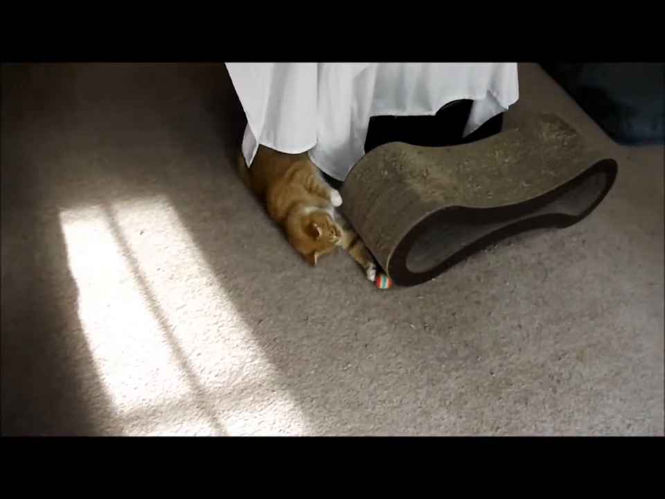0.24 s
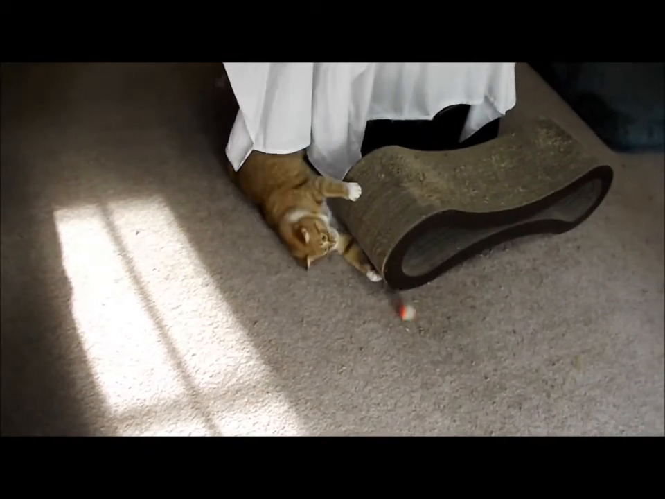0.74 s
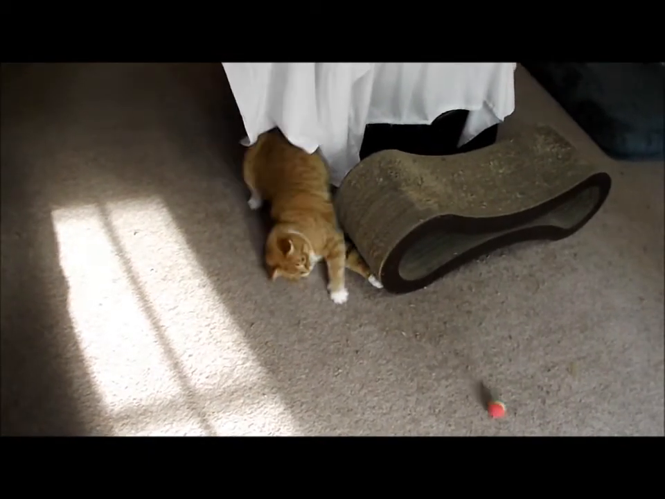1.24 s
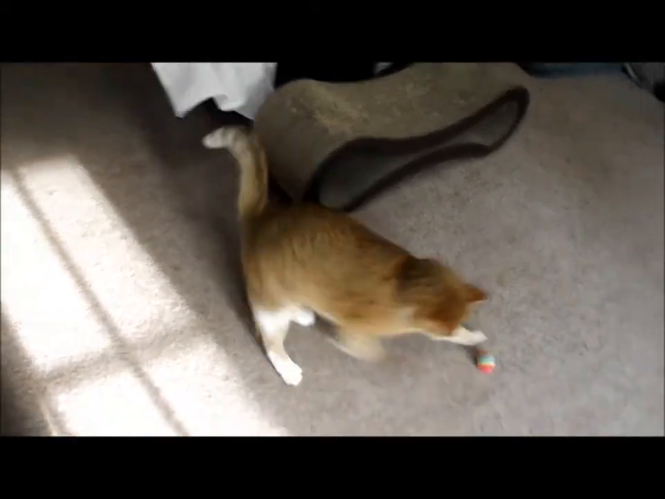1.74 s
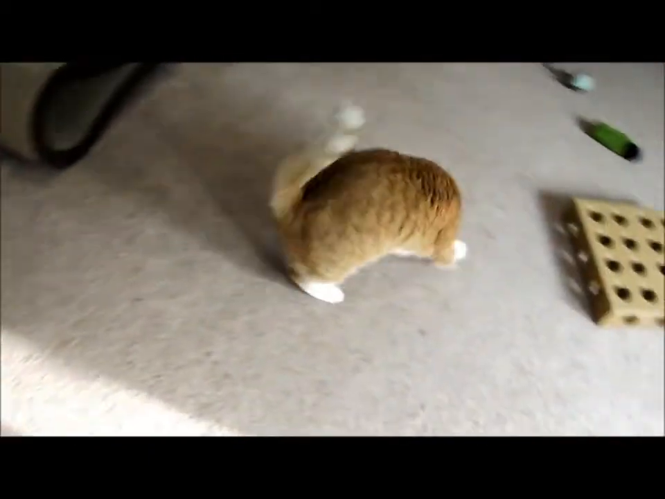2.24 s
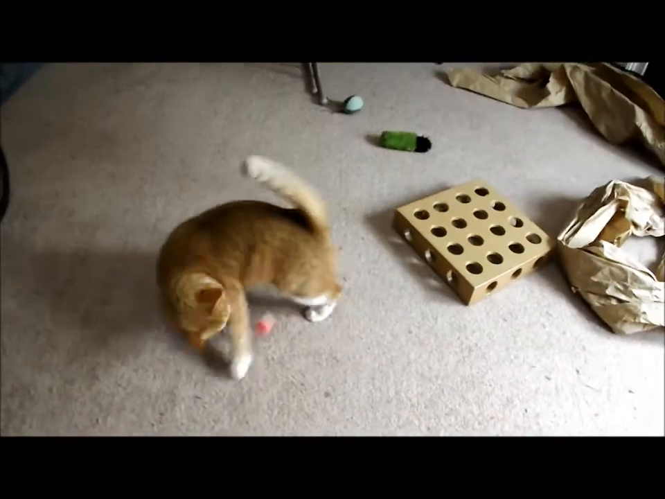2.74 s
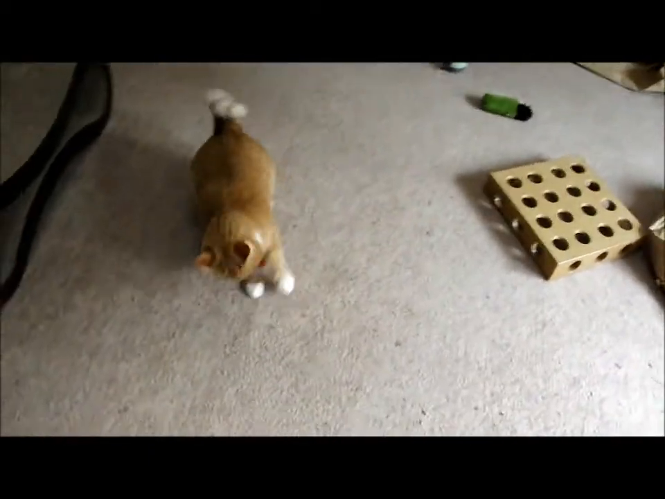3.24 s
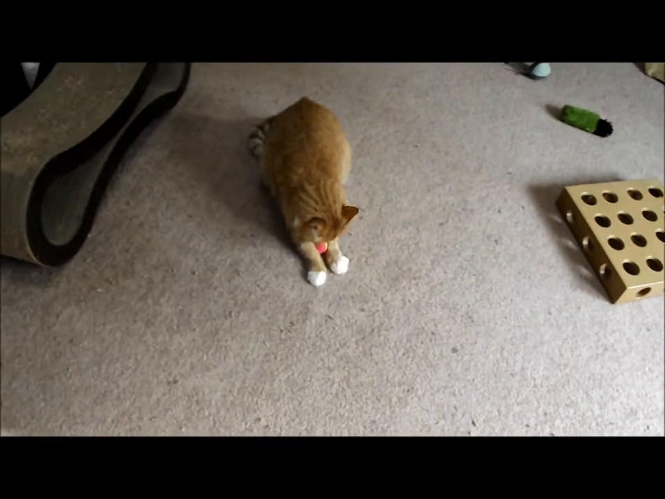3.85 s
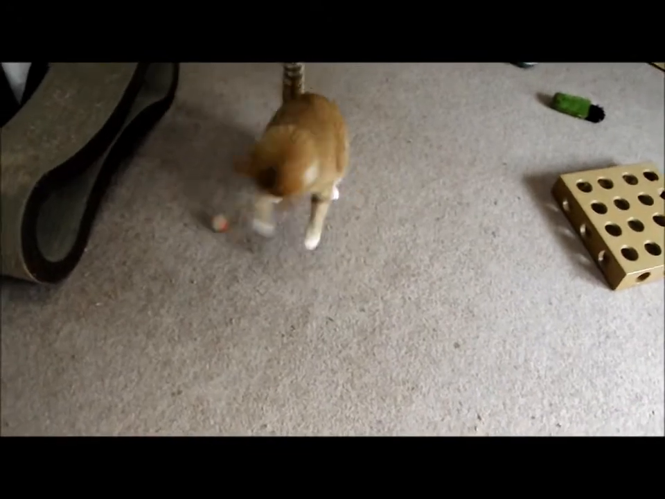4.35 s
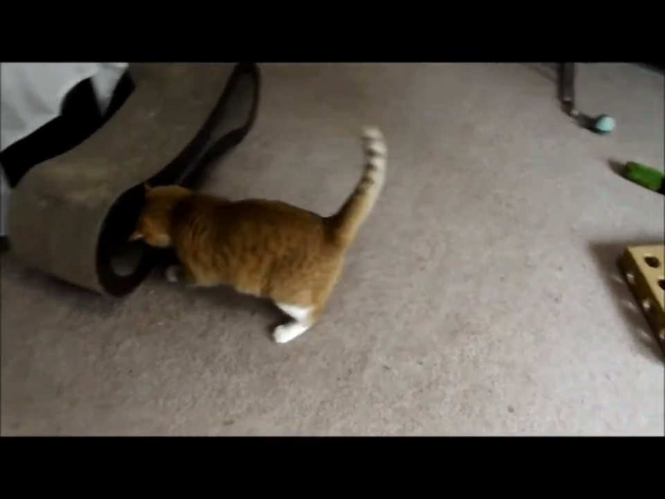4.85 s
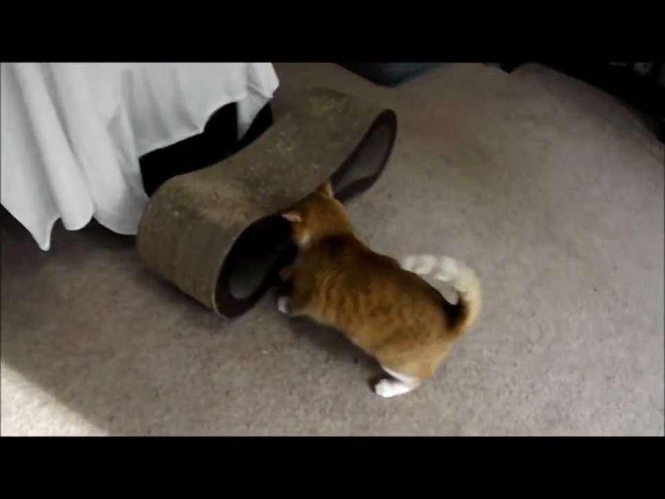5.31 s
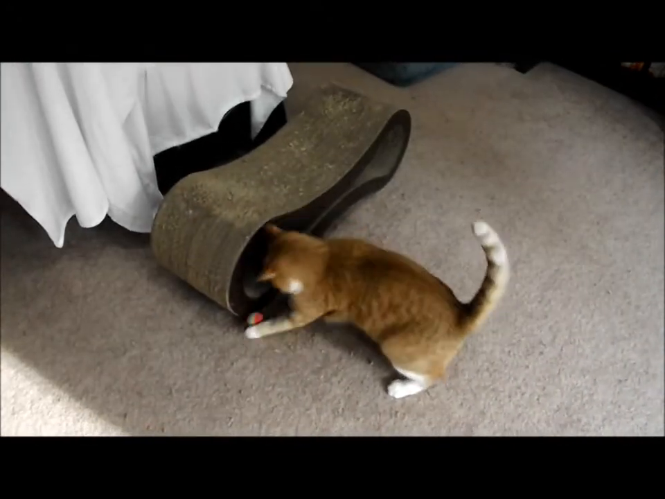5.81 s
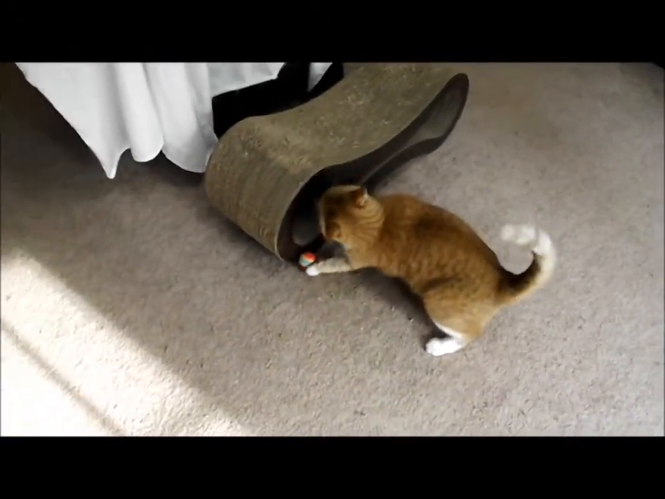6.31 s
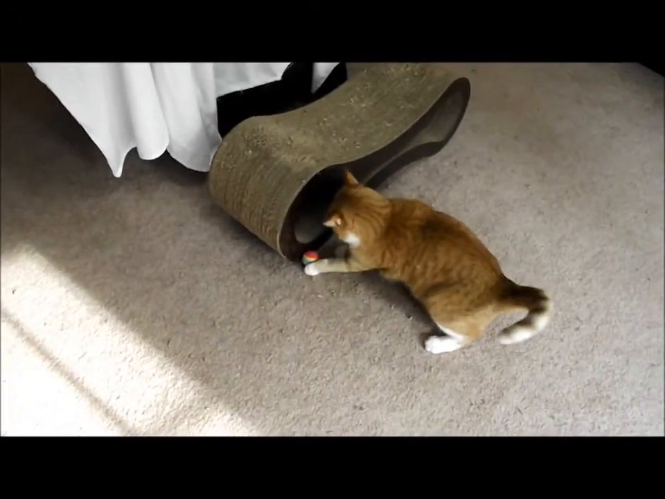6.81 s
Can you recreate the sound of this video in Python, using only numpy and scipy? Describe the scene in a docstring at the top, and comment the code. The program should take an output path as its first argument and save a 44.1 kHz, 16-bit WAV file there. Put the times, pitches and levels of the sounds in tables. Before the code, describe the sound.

Sharp clicks of a toy ball, scampering paws and occasional hollow bumps on a cardboard scratcher, over steady indoor hum and fan hiss.

```python
"""A sharp tick and a claw scrape over steady appliance hum, fan hiss and deep rumble: a cat bats a small hard
ball over carpet in a bare room. Claws and ball tick, paws thump, scuff and shuffle. A hollow cardboard
scratcher booms when hit and the air in its tunnel hums on; midway, something hollow stutters five times. Much
of the sound gathers near 3 kHz. Two microphone ports, side by side."""
import sys
import numpy as np
from scipy import signal
from scipy.fft import rfft, irfft
from scipy.io import wavfile

SR = 44100
rng = np.random.default_rng(int(sys.argv[2]) if len(sys.argv) > 2 else 0)


def store_pcm(level_fs):
    """Save levels as 16-bit WAV."""
    pcm = np.round(np.clip(level_fs, -1, 1) * 32767).astype(np.int16)
    wavfile.write(sys.argv[1], SR, np.atleast_2d(pcm).T)


N = 311787

# deep rumble (time [s], level [dB])
RUMBLE_LEVELS = [(0, -44.5), (1, -42.5), (2.9, -41.5), (3.4, -44.5), (5, -44.5), (7.07, -44)]
# appliance air noise (frequency [Hz], relative density [dB])
AIR_SPECTRUM = [(25, -29), (42, 4.5), (64, -6.5), (84, -9), (122, -14), (206, -14), (384, -20.5),
                (414, -18.5), (601, -25), (1360, -16.5), (1550, -25), (2420, -23.5), (3340, -12),
                (5630, -36.5), (16000, -48)]
# fan resonances (frequency [Hz], width [Hz], level [dB])
FAN_MODES = [(51.1, 9.8, -48.5), (82.6, 4.6, -61), (1172, 110, -64.5), (1374, 64, -60.5), (1780, 530, -59),
             (2063, 126, -62.5), (2720, 62, -66), (3379, 80, -57), (3533, 56, -62.5), (4330, 300, -59),
             (4750, 370, -68.5)]
# appliance hum (frequency [Hz], level [dB])
HUM_TONES = [(118.4, -51.5), (382.5, -62)]
# room decay (frequency [Hz], T60 [s])
ROOM_DECAY = [(200, 0.51), (530, 0.39), (1390, 0.32), (3680, 0.51), (9700, 0.19)]
# room colour (frequency [Hz], relative gain [dB])
WALL_COLOUR = [(150, 5.5), (400, 1), (1000, 12), (1500, 7), (2300, -6), (2800, -4.5), (3300, -0.5),
               (3900, -10.5), (5000, -1), (7000, -3.5), (12000, 0)]
# paw shuffling (start [s], busiest [s], end [s], scuffle [dB], rustle [dB], rasp [dB])
SHUFFLE_BOUTS = [(1.343, 1.712, 3.3, -51.5, -53.5, -79), (2.51, 2.976, 3.12, -42, -68, -77),
                 (4.423, 4.646, 4.9, -54.5, -59, -71)]
# scuffle, rustle, rasp at a bout's ends (level re busiest [dB])
BOUT_ENDS_DB = [
    [-19.5],
    [1],
    [-4],
]
# claws dragged through pile (time [s], level [dB])
CLAW_SCRAPES = [(.017, -26.5), (.6214, -31), (.9794, -33), (1.4395, -27), (1.704, -33), (1.8397, -29.5),
                (1.8694, -36), (2.019, -34.5), (2.104, -25.5), (2.289, -33), (2.4508, -34), (2.9506, -30),
                (3.8811, -35), (3.9135, -39)]
# squeaky scuffs (time [s], peak [dB], length [ms])
PAW_SCUFFS = [(1.8364, -26.5, 33), (1.8636, -36.5, 48), (1.934, -35, 13), (2.03, -41.5, 10),
              (2.2927, -39.5, 30), (2.347, -37, 5.9), (4.834, -31, 7)]
# pushes on a hollow body near the microphone (time [s], peak [dB])
HOLLOW_PUSHES = [(3.709, -23.5), (3.815, -22), (3.906, -22), (4.021, -24.5), (4.121, -25.5)]
# its modes (frequency [Hz], relative level [dB], T60 [s])
HOLLOW_MODES = [(283, -1.5, 0.067), (629, -13.5, 0.05), (860, -8.5, 0.082), (1069, 0, 0.037),
                (1263, -6, 0.055), (1410, -10.5, 0.079)]
# blows on the scratcher (time [s], peak [dB], tunnel re peak [dB], tilt [dB/octave])
SCRATCHER_BLOWS = [(.775, -38.5, 2, 0), (4.449, -33, -10, -14), (4.651, -29, -4, -8), (5.247, -29, -5, -1),
                   (5.49, -47.5, -1, -8), (5.716, -21.5, -3, -1.5), (5.729, -35, -9, -13),
                   (6.754, -34.5, 5, 12), (6.765, -35, -2, 4)]
# cardboard modes (frequency [Hz], relative level before tilt [dB], T60 [s])
CARDBOARD_MODES = [(326.7, 15.5, 0.1), (428, 7.5, 0.07), (497, 10, 0.069), (585, -24, 0.2),
                   (615, -6, 0.081), (836, 5, 0.039)]
# air in the scratcher (frequency [Hz], width [Hz], relative level [dB])
TUNNEL_MODES = [(222.6, 4.3, -3), (280, 7.3, -4.5)]
# paws on carpet (time [s], peak [dB], pitch [Hz])
PAW_THUMPS = [(0.622, -41.5, 453), (0.772, -26.5, 540), (1.0098, -32.5, 450), (1.2221, -26, 367),
              (1.4541, -19.5, 440), (1.489, -34.5, 147), (1.6603, -33.5, 221), (1.6916, -19, 240),
              (1.7135, -50, 280), (1.802, -22.5, 235), (1.816, -42, 260), (1.972, -37, 476),
              (1.9981, -30, 213), (2.101, -21, 400), (2.185, -24.5, 278), (2.3283, -33.5, 264),
              (2.4306, -23.5, 263), (2.4708, -26, 246), (2.5629, -30.5, 245), (2.651, -24.5, 332),
              (2.6983, -21.5, 323), (2.739, -29.5, 295), (2.833, -26, 260), (2.851, -23, 240),
              (2.878, -42, 144), (2.9528, -20.5, 240), (2.965, -33, 162), (3.027, -31.5, 248),
              (3.1675, -37.5, 340), (4.6155, -33, 241), (4.6404, -39, 255), (4.709, -44, 478),
              (5.721, -26, 576), (6.759, -26.5, 564)]
# claw and ball ticks (time [s], level [dB], pitch [Hz], then re level: treble [dB], low [dB], room [dB])
BALL_TICKS = [(0.0165, -15, 3130, -13, -12.5, -1.5), (.461, -20.5, 3960, -13, -33, -9),
              (.4638, -21.5, 3880, -3, -38, -2.5), (0.6135, -17, 2840, -15, -15, -1),
              (0.6163, -14, 3024, -15, -9.5, -1), (0.7677, 0, 3310, -10.5, -16, -5),
              (0.7702, -7, 3230, -13, -20, -12), (0.7856, -17, 3100, -5, -15, -5),
              (.789, -7, 2570, -14, -11.5, -1.5), (0.9634, -18, 3170, -1, -11, -4.5),
              (.9659, -33, 3260, -1, -12, -10), (1.0067, -17, 3340, -18, -14, -10),
              (1.0083, -12.5, 3370, -15.5, -15, -7.5), (1.033, -28, 3300, -19, -33, 5),
              (1.1875, -23, 3163, -14, -8, -2), (1.1905, -25, 3133, -18, -4.5, 5),
              (1.207, -26, 3380, -38, -25, 6), (1.2202, -15, 2800, -38, -2.5, 3),
              (1.2231, -5.5, 3280, -16, -34, -8), (1.2263, -6.5, 3250, -14, -30, -6),
              (1.2323, -13.5, 3360, -4.5, -11, -2), (1.2372, -12.5, 3310, -18, -14, -2),
              (1.2428, -13, 2860, -29, -40, -8), (1.246, -15.5, 2840, -29, -40, -8),
              (1.449, -30.5, 2610, -45, 5.5, -8), (1.4534, -16, 2560, -23, -3, -5),
              (1.4566, -15, 2720, -17, -10.5, -4), (1.7012, -21, 2780, -24, -5.5, -4),
              (1.8532, -23, 2520, -20, -14, 1.5), (1.969, -28, 2650, -31, -3.5, 5),
              (2.0978, -20.5, 2930, -20.5, 0.5, 2), (2.1203, -29.5, 2700, -25, 5.5, -20),
              (2.4517, -25, 2900, -28, -37, 6), (2.6018, -16, 3960, -5, -31, -3),
              (2.6124, -24, 4560, -18, -30, -2), (2.6188, -25.5, 4600, -25, -36, -2),
              (2.699, -8.5, 2730, -21, -0.5, -18), (2.711, -16.5, 2700, -25, -32, -2),
              (2.716, -21, 2600, -31, -23, -3), (2.7242, -21, 2900, -38, -30, -9),
              (2.7423, -28, 3144, -43, -21, 6), (2.816, -17.5, 3080, -35, -5, -29),
              (2.823, -14, 2800, -37, -9, -3), (2.832, -12, 2880, -28, -36, -3),
              (2.842, -27, 2870, -23, 2, -13), (2.9459, -18.5, 3000, -30, -39, 1),
              (2.952, -14.5, 2400, -19, -1, -9.5), (2.964, -18.5, 2730, -54, -3, -14),
              (3.164, -35.5, 2610, -28, 2, -16), (3.177, -28, 3000, -28, -4, -13),
              (3.735, -33, 3270, -27, -23, -16), (3.8958, -23.5, 2700, -39, -1.5, -14),
              (4.639, -22, 3040, -18, -10, -3), (4.688, -32, 3340, -31, -22, 3),
              (4.699, -16.5, 3000, -16, -14, -2), (4.7019, -22.5, 3145, -16, -18, -1),
              (5.245, -30.5, 3150, -46, -5, -6), (5.698, -26, 4360, -11, -44, -1),
              (5.7107, -10.5, 3064, -28, -3.5, -11), (5.7131, -11.5, 3034, -22, -8.5, -6),
              (5.715, -11.5, 2920, -51, -32, -3.5), (5.7343, -25, 3260, -35, 1, -8),
              (6.432, -10.5, 3050, -22, -8.5, -8), (6.4343, -12.5, 3045, -16, -7, -12),
              (6.4362, -10.5, 3080, -17, -8, -4), (6.752, -32, 2500, -43, 8, -4)]
# microphone treble loss (frequency [Hz], gain [dB])
MIC_RESPONSE = [(9000, 0), (13000, -3), (16000, -5)]
# port self-noise (frequency [Hz], relative density [dB])
HISS_SPECTRUM = [(300, -50), (2000, -35), (4000, 7), (8000, -11), (12000, 2), (14000, -4), (16000, -8)]


def amp(db):
    """dB to gain."""
    return 10 ** (np.asarray(db) / 20)


def unit_rms(x):
    """Scale to rms 1."""
    return x / np.sqrt(np.mean(x ** 2) + 1e-20)


def unit_peak(x):
    """Scale to peak 1."""
    return x / (abs(x).max() + 1e-20)


def curve_at(points, hz):
    """Interpolate over log frequency."""
    points_hz, values = np.transpose(points)
    return np.interp(np.log(hz + 1), np.log(points_hz + 1), values)


def add(mix, start_s, sound):
    """Mix in at start_s."""
    part = mix[..., round(start_s * SR):][..., :sound.shape[-1]]
    part += sound[..., :part.shape[-1]]


def band(x, lo_hz, hi_hz, order=2):
    """Butterworth band-pass."""
    return signal.sosfilt(signal.butter(order, [lo_hz, hi_hz], "band", fs=SR, output="sos"), x)


def resonate(x, hz, width_hz, stages=1):
    """Unity-gain resonances in series."""
    carrier = np.exp(2j * np.pi * hz * np.arange(len(x)) / SR)
    pole = np.exp(-np.pi * width_hz / SR)
    for _ in range(stages):
        x = 2 * (carrier * signal.lfilter([1 - pole], [1, -pole], x / carrier)).real
    return x


def coloured_noise(spectrum):
    """Steady noise, rms 1, shaped by (frequency [Hz], density [dB])."""
    hz = np.fft.rfftfreq(N, 1 / SR)
    return unit_rms(irfft(rfft(rng.standard_normal(N)) * amp(curve_at(spectrum, hz)), N))


def drift(top_hz):
    """Slow random wander, rms 1."""
    t = np.arange(N)[::64] / SR
    rates_hz = np.geomspace(.15, top_hz, 20)
    waves = sum(np.sin(2 * np.pi * (hz * t + rng.random())) / np.sqrt(hz) for hz in rates_hz)
    return np.repeat(unit_rms(waves), 64)[:N]


def rumble():
    """Lumpy noise below the hum."""
    level_db = np.interp(np.arange(N) / SR, *np.transpose(RUMBLE_LEVELS))
    return amp(level_db) * coloured_noise([(4, -5.5), (10, 8.0), (28, -1), (40, -17), (60, -41.5)])


def appliance(air_db=-47.5):
    """Broad air noise, noise-driven fan resonances, two wavering tones."""
    air = amp(air_db) * coloured_noise(AIR_SPECTRUM)
    white = rng.standard_normal(N)
    fan = sum(amp(db) * unit_rms(resonate(white, hz, width_hz, stages=2))
              for hz, width_hz, db in FAN_MODES)
    hum = np.zeros(N)
    for hz, db in HUM_TONES:
        gain = amp(db + 0.5 * drift(8.1))
        hum += gain * np.sin(2 * np.pi * np.cumsum(hz + 0.49 * drift(3.43)) / SR)
    return (air + fan) * amp(0.27 * drift(8.3)) + hum


def room_tail(build_s=0.009):
    """Sparse, uneven wall reflections build up; each band decays at its own rate."""
    slots = np.arange(100, SR - 20, 20)
    sizes = rng.standard_normal(len(slots)) * amp(3.0 * rng.standard_normal(len(slots)))
    onset = 1 - np.exp(-(slots / SR / build_s) ** 2)
    taps = np.zeros(SR)
    taps[slots + rng.integers(0, 20, len(slots))] = sizes * onset
    hz, t, spectra = signal.stft(taps, SR, nperseg=256)
    gain_db = curve_at(WALL_COLOUR, hz)[:, None] - 60 * t / curve_at(ROOM_DECAY, hz)[:, None]
    tail = signal.istft(spectra * amp(gain_db), SR, nperseg=256)[1]
    return tail / np.linalg.norm(tail)


def room(send, turn_hz=23):
    """Three tails take turns, so the room's answer keeps changing."""
    phase = 2 * np.pi * turn_hz * np.arange(N) / SR
    feeds = (send * np.sqrt(2 / 3) * np.cos(phase + k * np.pi / 3) for k in range(3))
    return sum(signal.fftconvolve(feed, room_tail())[:N] for feed in feeds)


def shuffles():
    """Grains of carpet pile: dull under weight, bright at the tips, raspy under claws."""
    lumps_db = rng.standard_normal((3, N // 256 + 1)).repeat(256, 1)[:, :N] * [[4.0], [2.5], [4.0]]
    grains = rng.standard_normal((3, N)) * amp(lumps_db)
    bands_hz = [(110, 1260), (1900, 3800), (5000, 7100)]
    layers = np.array([unit_rms(band(grain, *edges)) for grain, edges in zip(grains, bands_hz)])
    t, gains = np.arange(N) / SR, np.zeros((3, N))
    for start_s, busiest_s, end_s, *busiest_db in SHUFFLE_BOUTS:
        calm = np.interp(t, [start_s, busiest_s, end_s], [1, 0, 1])
        gains += amp(np.array(busiest_db)[:, None] + calm * BOUT_ENDS_DB) * (t > start_s) * (t < end_s)
    return (layers * gains).sum(0)


def scrapes(length_s=0.0275, treble_db=-26):
    """Claws drag through pile: soft bursts of fibre crackle."""
    out = np.zeros(N)
    age = np.arange(4096) / SR / length_s
    envelope = 1.74 * age * np.exp(-3 * age)
    for start_s, db in CLAW_SCRAPES:
        noise, spread = rng.standard_normal((2, len(age)))
        crackle = noise * amp(9.3 * spread)
        mid = unit_rms(band(crackle, 1200, 3900))
        treble = amp(treble_db) * unit_rms(band(crackle, 3400, 13400))
        add(out, start_s, amp(db) * (mid + treble) * envelope)
    return out


def scuffs(squeak_hz=1190):
    """Fibres slip briefly and excite one note."""
    out, t = np.zeros(N), np.arange(8192) / SR
    for start_s, db, length_ms in PAW_SCUFFS:
        age = t / (length_ms / 1000)
        slip = rng.standard_normal(len(t)) * age * np.exp(-3 * age)
        squeak = resonate(resonate(slip, squeak_hz, width_hz=160), squeak_hz, width_hz=250)
        add(out, start_s, amp(db) * unit_peak(squeak))
    return out


def stutters(push_s=0.009, rasp_db=-9, rasp_t60_s=0.06):
    """Short pushes swell a hollow body's modes, each time a little differently, with a faint rasp."""
    out, t = np.zeros(N), np.arange(4096) / SR
    swell = np.sin(np.pi / 2 * np.minimum(t / push_s, 1)) ** 2
    released_s = np.maximum(t - push_s, 0)
    scatter = rng.standard_normal((len(HOLLOW_PUSHES), len(HOLLOW_MODES), 3))
    for (start_s, db), draws in zip(HOLLOW_PUSHES, scatter):
        tones = np.zeros(len(t))
        for (hz, mode_db, t60_s), (spread, detune, phase) in zip(HOLLOW_MODES, draws):
            decay = amp(mode_db + 2 * spread - 60 * released_s / t60_s)
            tones += decay * np.sin(2 * np.pi * (hz * (1 + 0.013 * detune) * t + phase))
        noise = rng.standard_normal(len(t))
        rasp = unit_rms(band(noise, 440, 1540, order=3)) + 0.49 * unit_rms(band(noise, 2945, 3010))
        rasp *= amp(rasp_db - 60 * released_s / rasp_t60_s)
        add(out, start_s, amp(db) * unit_peak(swell * (tones + rasp)))
    return out


def scratcher(contact_s=0.00074, grit_s=0.022):
    """Cardboard thuds, each spot with its own brightness; the tunnel air builds slowly and hums on."""
    out, t = np.zeros(N), np.arange(SR // 2) / SR
    pulse = np.sin(np.pi * np.minimum(t[:1024] / contact_s, 1))
    for start_s, db, tunnel_db, tilt_db_oct in SCRATCHER_BLOWS:
        grit = 0.37 * rng.standard_normal(1024) * np.exp(-t[:1024] / grit_s)
        ring = np.zeros(len(t))
        for hz, mode_db, t60_s in CARDBOARD_MODES:
            tilted_db = mode_db + tilt_db_oct * np.log2(hz / 312)
            ring += amp(tilted_db - 60 * t / t60_s) * np.sin(2 * np.pi * hz * t)
        add(out, start_s, amp(db) * unit_peak(signal.fftconvolve(pulse + grit, ring)))
        for hz, width_hz, mode_db in TUNNEL_MODES:
            age = 2 * np.pi * width_hz * t
            hum = age * np.exp(-age) * np.sin(2 * np.pi * hz * t)
            add(out, start_s, amp(db + tunnel_db + mode_db) * hum)
    return out


def thumps(knock_ratio=2.27, knock_db=-8, room_db=-19.5, room_slope=0.54):
    """A soft pad presses the carpet for about a cycle; toes knock higher. Rows: direct, room send."""
    out, t = np.zeros((2, N)), np.arange(2048) / SR
    for peak_s, db, hz in PAW_THUMPS:
        cycles = t * hz * np.array([[1], [knock_ratio]])
        decay_cycles = 0.366 * (hz / 293) ** 0.34
        pad, knock = -np.sin(2 * np.pi * cycles) * cycles * np.exp(-cycles / decay_cycles)
        direct = amp(db) * unit_peak(pad + amp(knock_db) * knock)
        send = amp(room_db + room_slope * db) * unit_peak(pad)  # loud thumps are near and dry
        add(out, peak_s - abs(pad).argmax() / SR, np.array([direct, send]))
    return out


def ticks(crackle_db=-25.5, rise_s=0.00026, decay_s=0.0051, floor_db=-13.5, floor_s=0.0028):
    """Snap and crackle ring a small hard shell; the floor echoes them. Rows: direct, room send."""
    out, t = np.zeros((2, N)), np.arange(2048) / SR
    snap = signal.unit_impulse(256)
    edge = unit_peak(resonate(band(snap, 5000, 12500), 6500, width_hz=3000))
    body = unit_peak(band(snap, 1220, 2394, order=3))
    envelope = (1 - np.exp(-t / rise_s)) * np.exp(-t / decay_s)
    for peak_s, db, hz, treble_db, low_db, room_db in BALL_TICKS:
        drive = band(snap, .6 * hz, 1.5 * hz, order=3)
        shell = unit_peak(resonate(drive, hz, width_hz=1840, stages=2))
        noise, spread = rng.standard_normal((2, len(t)))
        force = amp(crackle_db - 0.06 * db + 1.5 * spread) * noise * envelope  # hard ticks are cleaner
        force[0] = 1  # the snap
        force += amp(floor_db) * np.pad(force, (round(floor_s * SR), 0))[:len(t)]
        bright = shell + amp(treble_db) * edge
        direct = signal.fftconvolve(force, bright + amp(low_db) * body)
        send = signal.fftconvolve(force, bright + amp(low_db - 8.5) * body)  # carpet absorbs lows
        add(out, peak_s - abs(shell).argmax() / SR, amp(db) * np.array([direct, amp(room_db) * send]))
    return out


def scene():
    """Same mix at both ports; ticks, thumps and scratcher feed the room."""
    direct, send = ticks() + thumps()
    cardboard = scratcher()
    direct += cardboard + stutters() + scuffs() + scrapes() + shuffles()
    mono = direct + room(send + amp(-8) * cardboard) + appliance() + rumble()
    return np.array([mono, mono])


def record(dry):
    """Left-port lag, treble loss, independent hiss per port, low-pass."""
    left_lag_s, hiss_db, cutoff_hz = 2.4e-5, -69.5, 15700
    hz = np.fft.rfftfreq(N, 1 / SR)
    delays = np.exp(-2j * np.pi * hz * [[left_lag_s], [0]])
    heard = irfft(rfft(dry) * delays * amp(curve_at(MIC_RESPONSE, hz)), N)
    hiss = amp(hiss_db) * np.array([coloured_noise(HISS_SPECTRUM) for _ in range(2)])
    lowpass = signal.firwin(511, cutoff_hz, window=("kaiser", 9), fs=SR)
    return signal.oaconvolve(heard + hiss, lowpass[None], "same")


dry = scene()
out = record(dry)
store_pcm(out)
```